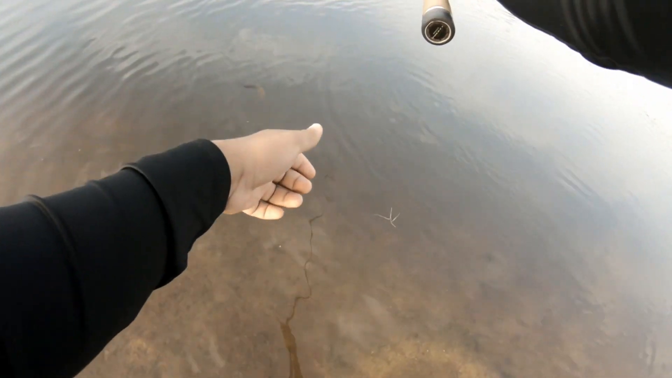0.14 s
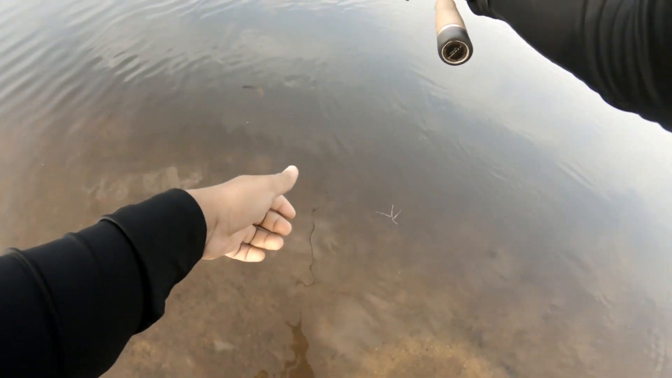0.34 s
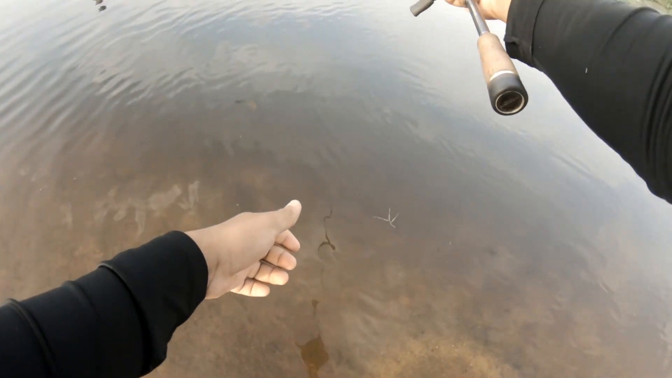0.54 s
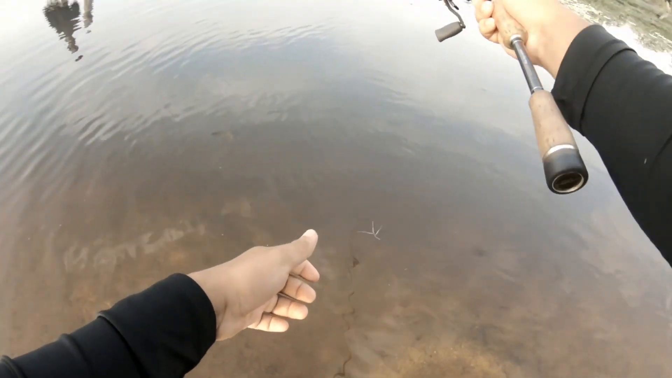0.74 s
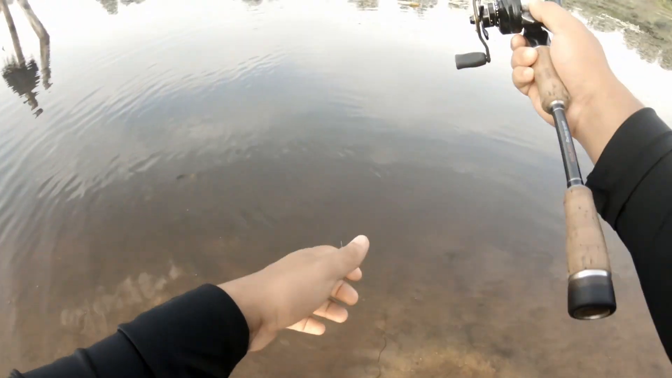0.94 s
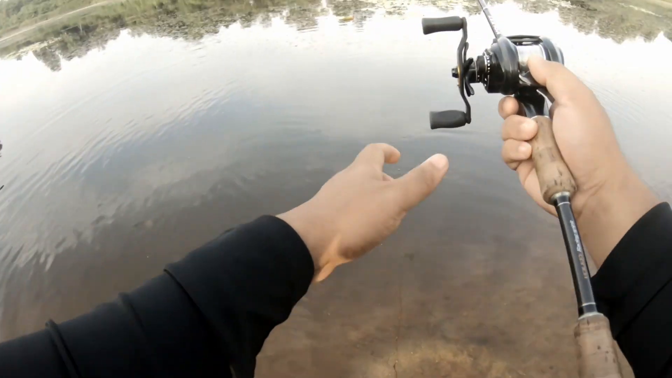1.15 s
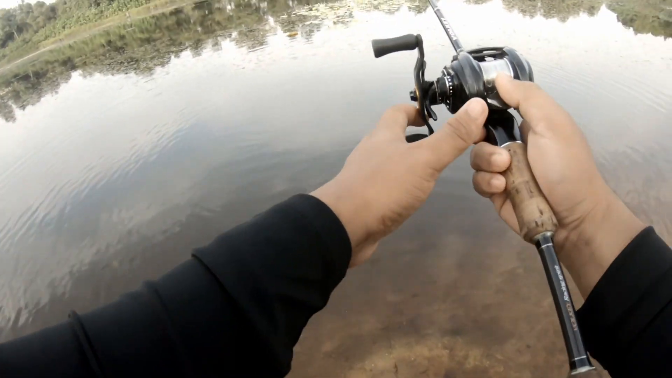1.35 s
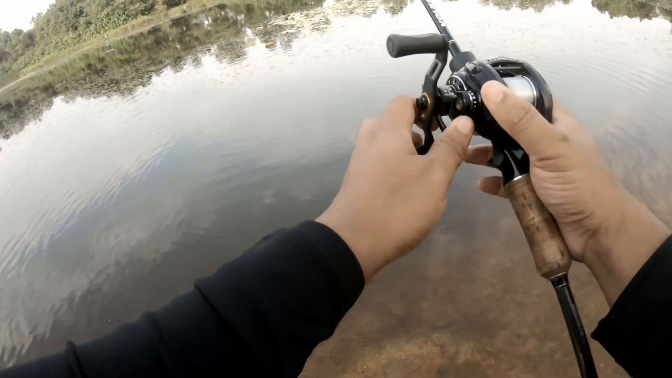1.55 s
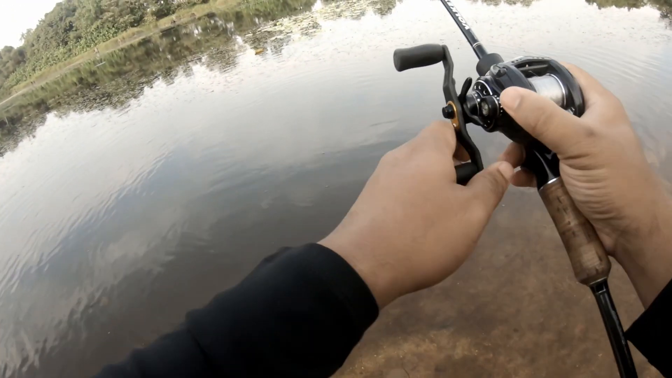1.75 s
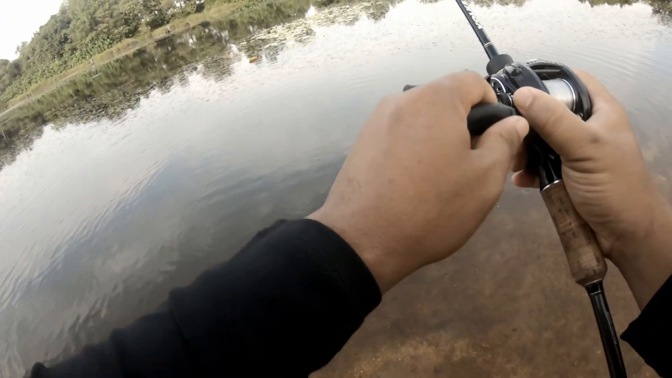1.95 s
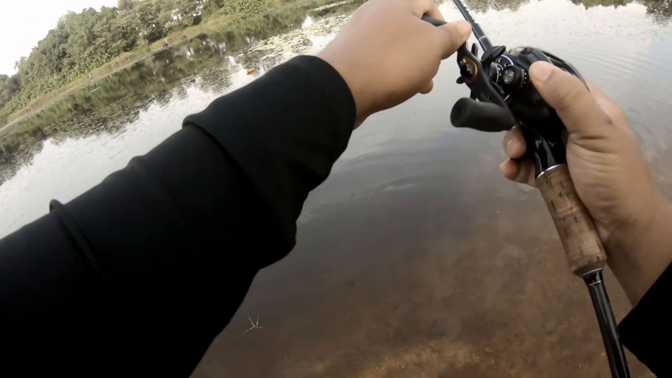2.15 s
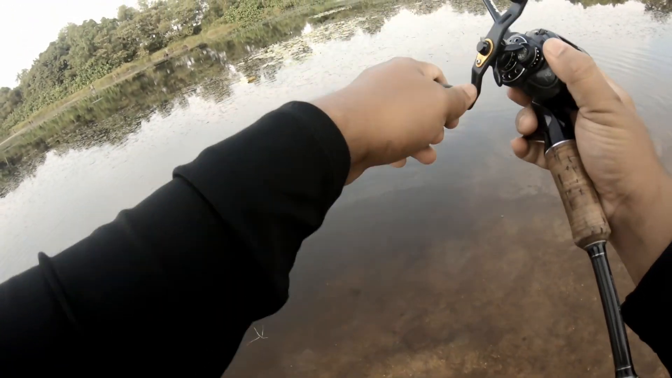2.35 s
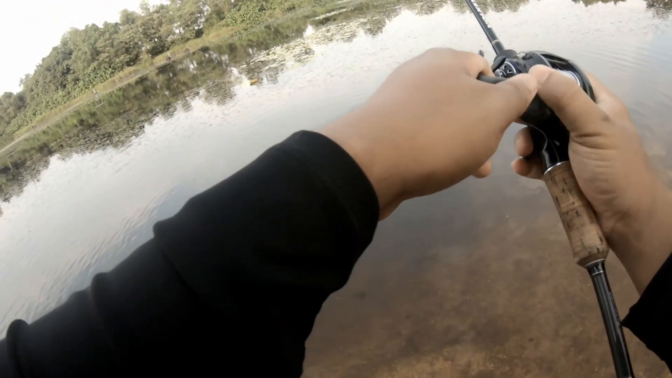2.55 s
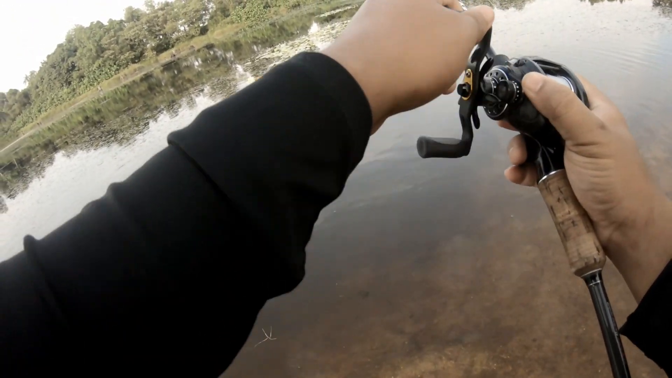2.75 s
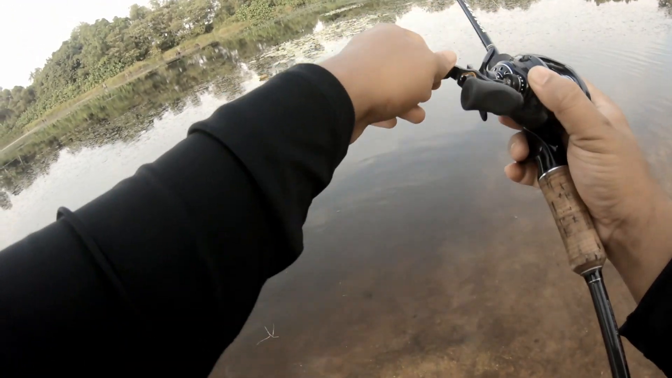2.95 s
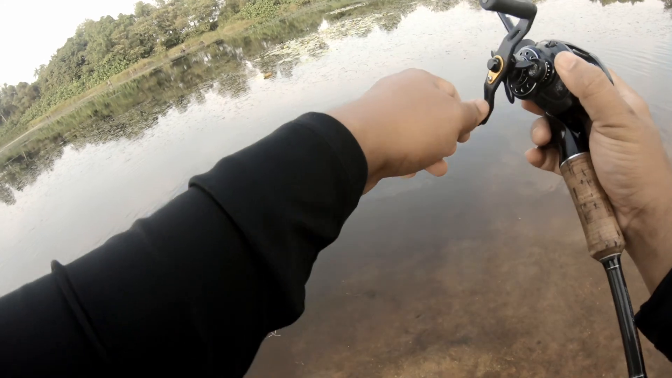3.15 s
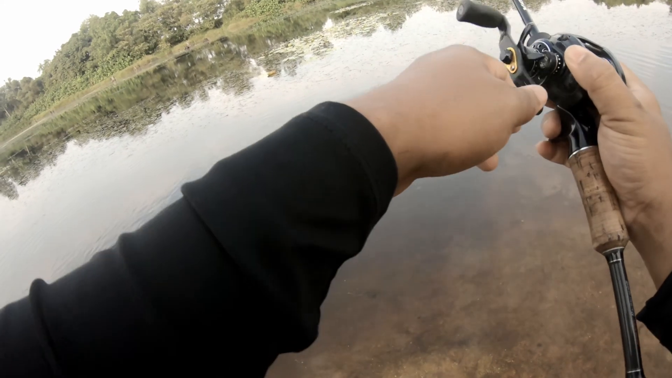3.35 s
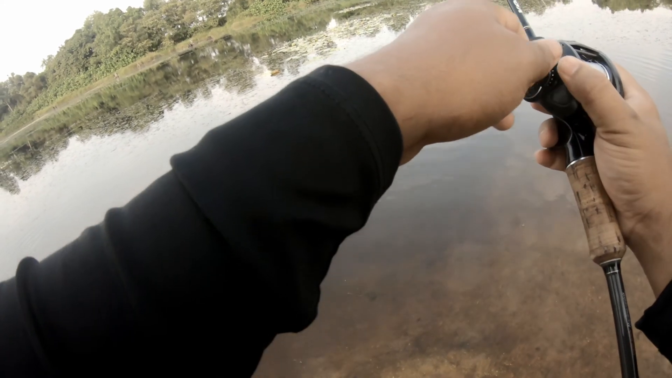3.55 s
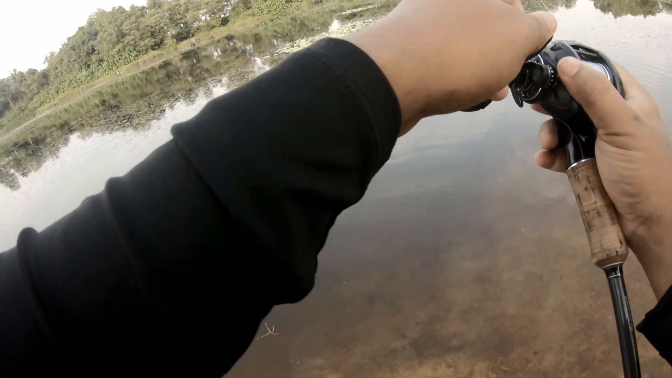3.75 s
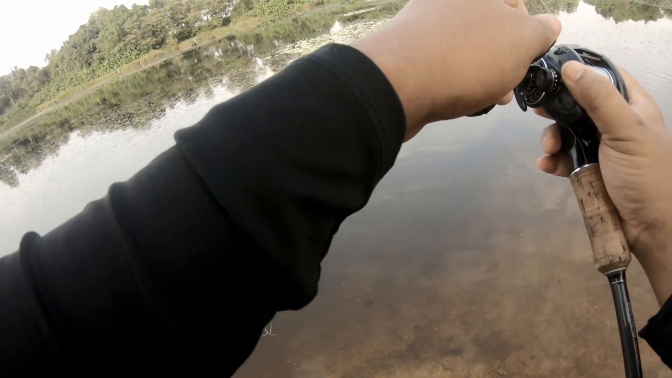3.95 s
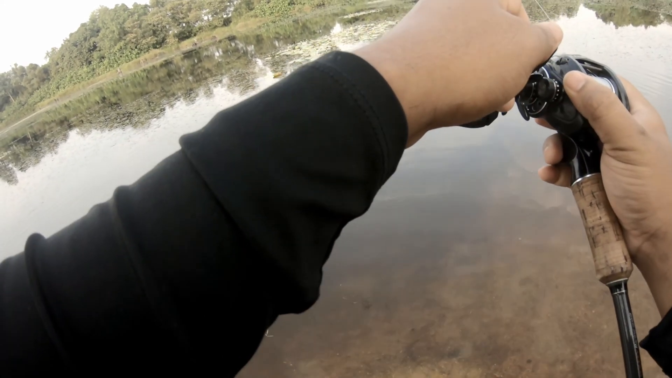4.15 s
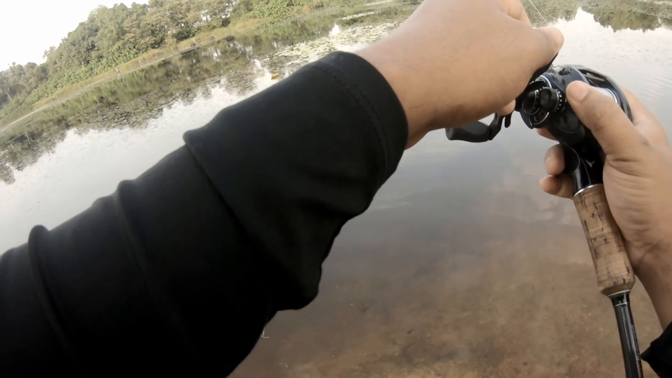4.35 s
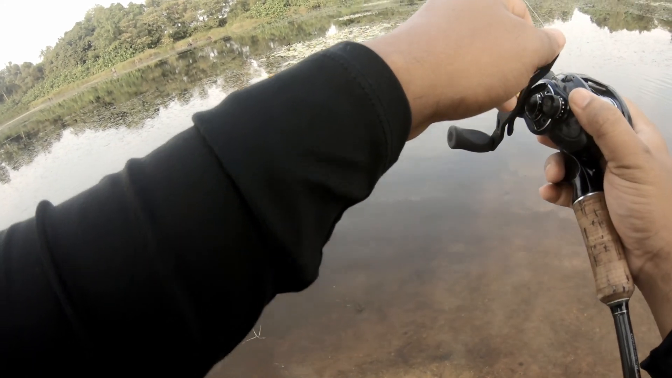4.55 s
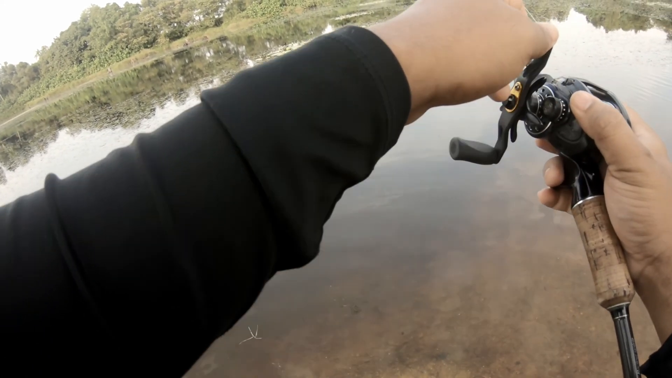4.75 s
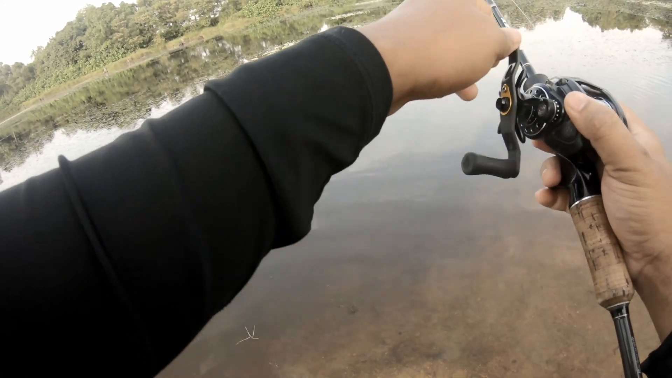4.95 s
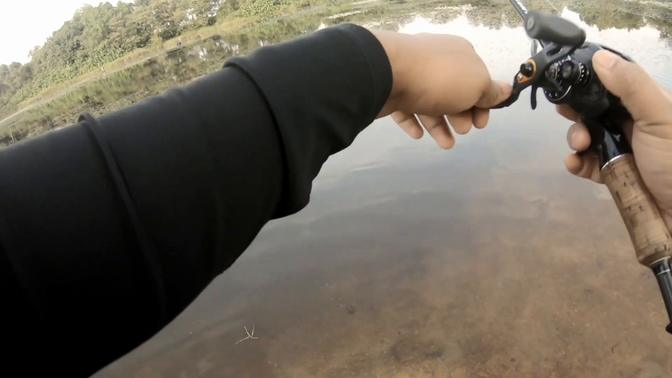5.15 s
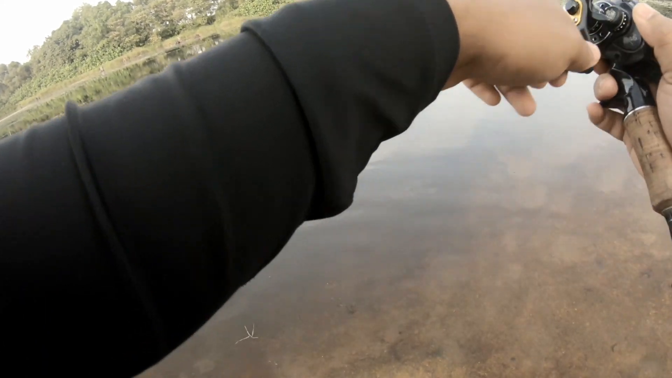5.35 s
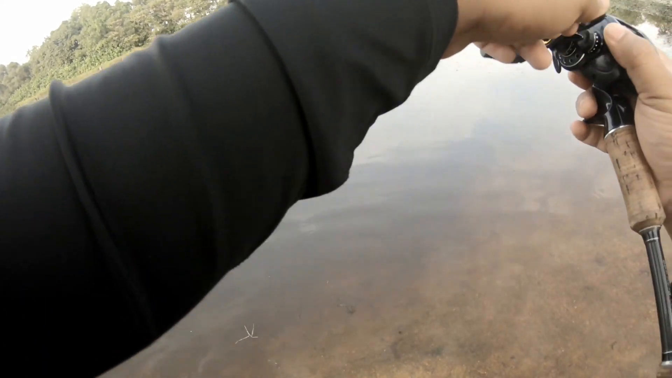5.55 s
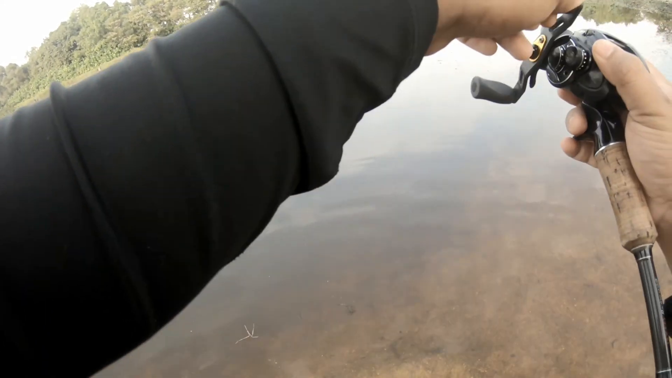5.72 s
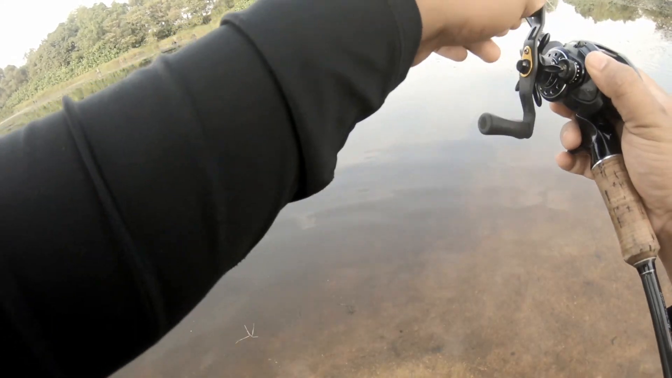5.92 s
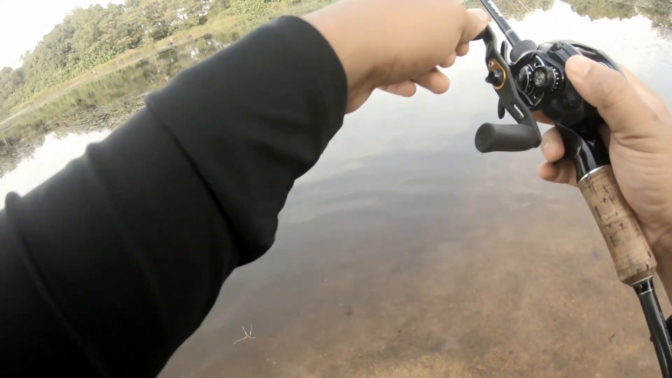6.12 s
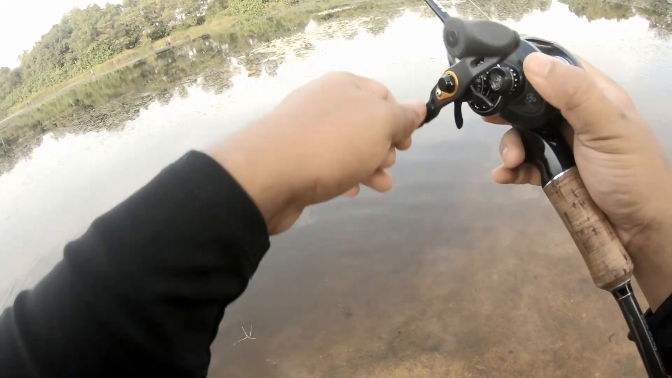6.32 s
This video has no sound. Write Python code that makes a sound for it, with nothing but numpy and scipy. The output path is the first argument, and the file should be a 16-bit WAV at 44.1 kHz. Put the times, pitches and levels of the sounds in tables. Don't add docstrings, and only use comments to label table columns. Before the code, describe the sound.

Close on the chest, a sleeve brushes and fishing line hisses. A hand bumps the grip, light ticks follow, then two loud, bright metal snaps as the reel clutch engages. Dull thuds, small rattles and a brief sagging spool whir follow. Afterwards only soft gear grinding and rare ticks remain, with far birds, shrill insects and low wind over an open pond.

```python
import sys
import numpy as np
from scipy import signal
from scipy.fft import irfft, next_fast_len
from scipy.io import wavfile
from scipy.ndimage import uniform_filter1d

SR = 44100
rng = np.random.default_rng(int(sys.argv[2]) if len(sys.argv) > 2 else 0)


def generate_wav(signal):
    frames = np.transpose(np.atleast_2d(signal))
    scaled = np.clip(frames, -1, 1) * 32767
    pcm = np.round(scaled).astype(np.int16)
    wavfile.write(sys.argv[1], SR, pcm)


def voltage_ratio(decibels):
    exponent = np.asarray(decibels, float) / 20
    return 10 ** exponent


N = 285768

PORTS = voltage_ratio([[4.0], [1.8]])


def evened(x):
    return x / np.sqrt(np.mean(x ** 2) + 1e-20)


def add(mix, s, sound):
    part = mix[..., max(round(s * SR), 0):][..., :sound.shape[-1]]
    part += sound[..., :part.shape[-1]]


def resonate(x, hz, width):
    pole = np.exp((2j * np.pi * hz - np.pi * width) / SR)
    return 2 * signal.lfilter([1 - abs(pole)], [1, -pole], x).real


def swells(rows, rest_db, column=2):
    t = np.arange(N) / SR
    return voltage_ratio(rest_db) + sum(voltage_ratio(row[column]) * np.exp(-((t - row[0]) / row[1]) ** 2) for row in rows)


def hiss(colour, size, patchy_db, flicker_db, channels=1):
    frames = N * 4 // size + 5
    hz = np.fft.rfftfreq(size, 1 / SR)
    f, db = np.transpose(colour)
    shape = np.interp(np.log(hz + 1), np.log(f), db, left=-90, right=-90)[:, None]
    patches = rng.standard_normal((frames, len(hz))).T
    patches = uniform_filter1d(patches, size // 64, 0)
    patches = evened(uniform_filter1d(patches, 8192 // size, 1))
    flicker = evened(uniform_filter1d(rng.standard_normal(frames), size=3))
    a, b = rng.standard_normal((frames, len(hz), channels, 2)).T
    spectra = (a + 1j * b) * voltage_ratio(shape + patchy_db * patches + flicker_db * flicker)
    return evened(signal.istft(spectra, nperseg=size, noverlap=size * 3 // 4)[1][:, :N])


def band(hz, width, channels=1, order=2):
    size = next_fast_len(N)
    f = np.fft.rfftfreq(size, 1 / SR)
    a, b = rng.standard_normal((2, channels, len(f)))
    spectrum = (a + 1j * b) * np.exp(-((f - hz) / width) ** order)
    return evened(irfft(spectrum, size)[:, :N])


def chorus_gain(full_db):
    start_db, full_s = -16, 4.5
    return voltage_ratio(full_db + start_db * np.maximum(1 - np.arange(N) / SR / full_s, 0))


def blows(rows):
    out = np.zeros(N)
    for s, db, hz, cycles in rows:
        t = np.arange(round(2 * cycles / hz * SR)) / SR
        add(out, s, voltage_ratio(db) * np.sin(2 * np.pi * hz * t) * np.hanning(len(t)))
    return out


def trees(x, t60, gap_s):
    taps = np.zeros(SR // 2)
    at = np.arange(round(gap_s * SR), SR // 2 - 20, 20)
    signs = rng.choice([-1., 1.], len(at))
    taps[at + rng.integers(0, 20, len(at))] = signs * voltage_ratio(-60 * at / SR / t60)
    return signal.oaconvolve(x, taps / np.linalg.norm(taps))[:N]


def bird(rows, rough, edge, wet_db, lift_db):
    out = np.zeros(N)
    flutter = uniform_filter1d(rng.standard_normal(N), size=200)
    flutter = evened(uniform_filter1d(flutter, size=200))
    for s, length, start_hz, mid_hz, end_hz, db in rows:
        u = np.linspace(0, 1, round(length * SR))
        hz = 2 * (start_hz * (u - .5) * (u - 1) + 2 * mid_hz * u * (1 - u) + end_hz * u * (u - .5))
        shape = signal.windows.tukey(len(u), edge)
        shape = shape * voltage_ratio(lift_db * np.log2(hz / mid_hz))
        add(out, s, voltage_ratio(db) * np.sqrt(2) * shape * np.sin(2 * np.pi * np.cumsum(hz) / SR))
    out = out * voltage_ratio(rough * flutter)
    return out + voltage_ratio(wet_db) * trees(out, t60=0.43, gap_s=0.0025)


def glides(rows, low):
    return [(s, length, a, low * min(a, b) + (1 - low) * max(a, b), b, db) for s, length, a, b, db in rows]


def shaped(rows, shape):
    return [(s, shape[0], *(hz * np.array(shape[1:])), db) for s, hz, db in rows]


def sleeve_and_line():
    # middle in seconds, half length in seconds, cloth level in dB, line level in dB.
    moves = [(.14, 0.3, -77, -62), (.48, 0.32, -65.5, -76.5), (.72, 0.23, -64.5, -64.5),
             (1.04, 0.14, -62.5, -65), (1.3, 0.11, -67.5, -64), (1.45, 0.0081, -80, -66),
             (1.51, 0.027, -73, -62), (1.58, 0.18, -73, -66.5), (1.663, 0.013, -58, -49),
             (1.76, 0.15, -65.5, -65), (2.14, 0.15, -67.5, -62.5), (2.55, 0.12, -71, -75),
             (3.1, 0.44, -84, -70), (3.47, 0.051, -90, -71), (4.65, 0.12, -79, -78),
             (5.2, 0.28, -78.5, -76.5), (5.43, 0.048, -73, -85), (6.48, 0.24, -66, -66.5)]
    # frequency in Hz, density in dB per Hz.
    cloth_colour = [(700, -3.5), (1100, 2.5), (1800, 0), (2600, -2.5), (3400, -3.5), (4200, -9.5)]
    # frequency in Hz, density in dB per Hz.
    line_colour = [(2800, -14.5), (3700, 0), (4500, 2.5), (5800, 0.5), (6600, -9), (7300, -6), (8200, -26),
                   (11000, -56)]
    cloth = swells(moves, rest_db=-79) * hiss(cloth_colour, size=512, patchy_db=3.0, flicker_db=0.5)
    line = swells(moves, rest_db=-84, column=3) * hiss(line_colour, size=512, patchy_db=1.8, flicker_db=1.0)
    return cloth + line


def gears():
    # middle in seconds, half length in seconds, peak in dB.
    pushes = [
        (.2, 0.52, -81),
        (.7, 0.069, -63),
        (1.05, 0.17, -72.5),
        (1.72, 0.063, -51),
        (1.83, 0.15, -62.5),
        (2.06, 0.099, -64),
        (2.35, 0.34, -78),
        (4.52, 0.072, -69),
        (4.8, 0.34, -69),
        (1.47, 0.028, -65),
    ]
    # frequency in Hz, density in dB per Hz.
    gear_colour = [(300, -6.5), (450, -0.5), (620, -6), (780, 0.5), (900, -7.5), (1000, -9.5),
                   (1400, -28.5), (2500, -47)]
    return swells(pushes, rest_db=-69.5) * hiss(gear_colour, size=512, patchy_db=1.1, flicker_db=1.8)


def line_fizz():
    # middle in seconds, half length in seconds, peak in dB.
    flick_swells = [(.1, 0.065, -73), (.27, 0.043, -71), (.68, 0.03, -73), (.745, .025, -78),
                    (1.5, 0.044, -77), (1.645, 0.027, -67), (1.72, 0.048, -72), (1.45, 0.013, -78),
                    (1.518, .008, -72), (4.495, .006, -78), (4.72, .012, -79), (5.228, .005, -74)]
    # frequency in Hz, density in dB per Hz.
    fizz_colour = [(10500, -19), (11050, -11.5), (12000, -4.5), (13000, 10), (14000, -7), (15300, -3.5),
                   (15750, -12), (15900, -56)]
    noise = hiss(fizz_colour, size=512, patchy_db=1.0, flicker_db=-2.0, channels=2)
    return PORTS * swells(flick_swells, rest_db=-100) * noise


def wind():
    # middle in seconds, half length in seconds, peak in dB.
    gusts = [
        (.22, 0.34, -41.5),
        (1.1, 0.7, -43.5),
        (1.8, 0.24, -45.5),
        (2.75, 0.45, -49),
        (3.42, 0.1, -46.5),
        (4.1, 1, -46),
        (5.3, 0.2, -43),
        (5.7, 0.42, -45.5),
        (6.5, 0.1, -36),
    ]
    # frequency in Hz, density in dB per Hz.
    wind_colour = [(18, -39), (30, -2.5), (60, 6), (90, 0), (130, -15.5), (200, -36.5)]
    return swells(gusts, rest_db=-68) * hiss(wind_colour, size=2048, patchy_db=1.5, flicker_db=2.5)


def rumble():
    # frequency in Hz, density in dB per Hz.
    hum_colour = [(80, -21), (120, -1.5), (163, 2.5), (210, -4), (300, -11.5), (380, -21), (520, -42),
                  (900, -86)]
    rumble_db, drop_db = -43.5, -4
    drop_s, back_s = 1.93, 6.16
    t = np.arange(N) / SR
    still = np.clip(np.minimum(t - drop_s, back_s - t) / .5 + .5, 0, 1)
    return voltage_ratio(rumble_db + drop_db * still) * hiss(hum_colour, size=1024, patchy_db=0.87, flicker_db=2.0)


def pond_air():
    # frequency in Hz, density in dB per Hz.
    pond_colour = [(710, -41), (1200, -0.5), (1450, -8), (2510, -9), (3030, -23), (3580, -3), (4080, -6),
                   (4740, 2), (5710, -7.5), (6330, -4), (6890, -10.5), (7420, -5.5), (10700, -12),
                   (11200, -42), (14600, -68), (22000, -120)]
    # centre in Hz, width in Hz, level in dB.
    drones = [
        (54, 18, -53),
        (165.8, 3.35, -53.5),
        (4730, 160, -79.5),
        (6320, 310, -82),
        (7450, 150, -86),
    ]
    air = voltage_ratio(-70.5) * hiss(pond_colour, size=1024, patchy_db=1.3, flicker_db=.1)
    for hz, width, db in drones:
        air += voltage_ratio(db) * band(hz, width)
    return air + PORTS * chorus_gain(-85) * band(11880, 450, channels=2)


def katydid():
    pitch_hz, per_s, at_s, blip_s = 11780, 135.68, 5.0045, .0011
    fall_hz_per_s, spread_hz, spread_db = 2e5, 30, 1.0
    drift, port_turn = .6, 2.1
    turns = (np.arange(N) / SR - at_s) * per_s + .5
    blip = np.floor(turns).astype(int)
    d = (turns % 1 - .5) / per_s
    traits = rng.standard_normal((blip.max() - blip.min() + 1, 5))
    phase, pitch, size, left, right = traits[blip - blip.min()].T
    wander = drift * np.cumsum(phase * np.diff(blip, prepend=0).clip(0, 1))
    angle = wander + 2 * np.pi * (pitch_hz + spread_hz * pitch - fall_hz_per_s * d / 2) * d
    waves = np.sin([angle + .3 * left, angle - port_turn + .3 * right])
    blips = voltage_ratio(spread_db * size) * np.exp(-(d / blip_s) ** 2) * waves
    return PORTS * chorus_gain(-76.5) * evened(blips)


def still_air():
    # frequency in Hz, density in dB per Hz.
    still_colour = [(10900, -30), (11350, -7.5), (12000, 0.5), (12600, 3), (13500, -0.5), (14500, -3.5),
                    (15700, -6), (15800, -50)]
    rise = np.minimum(np.arange(N) / SR / 2.5, 1)
    top = hiss(still_colour, size=1024, patchy_db=1.0, flicker_db=-0.2, channels=2)
    return PORTS * voltage_ratio(-78.5) * top + voltage_ratio(-92) * rise * band(11000, 330)


def whistler():
    # start in seconds, length in seconds, start in Hz, end in Hz, level in dB.
    slurs = [(.03, 0.11, 2770, 2640, -67), (.105, 0.05, 2300, 2000, -70), (.494, 0.079, 2930, 2570, -68),
             (.94, 0.13, 1565, 1964, -64.5), (1.356, 0.084, 1740, 1866, -72),
             (2.836, 0.023, 2850, 3220, -62), (3.222, 0.037, 3360, 3340, -60.5),
             (3.246, 0.036, 3390, 3180, -55), (3.414, 0.03, 2220, 1850, -65.5),
             (3.735, 0.033, 2900, 2630, -60), (3.76, .157, 2654, 1945, -58.5)]
    # start in seconds, length in seconds, start in Hz, end in Hz, level in dB.
    curls = [
        (.412, 0.11, 2630, 3770, -64.5),
        (.8, 0.16, 2385, 3650, -64.5),
        (2.903, 0.094, 3350, 2644, -57),
        (3.143, 0.065, 2680, 3400, -61.5),
        (3.545, 0.09, 1936, 3030, -61.5),
    ]
    # start in seconds, length in seconds, pitch in Hz, level in dB.
    pips = [
        (5.563, 0.017, 3520, -72),
        (3.65, 0.056, 2300, -76),
        (4.042, 0.18, 2430, -80),
        (1.085, .025, 5270, -63),
    ]
    song = glides(slurs, low=.53) + glides(curls, low=.8)
    song += [(s, length, hz, hz, hz, db) for s, length, hz, db in pips]
    return bird(song, rough=3.2, edge=0.34, wet_db=-9, lift_db=1.5)


def chipper():
    # start in seconds, length in seconds, start in
    # Hz, end in Hz, level in dB.
    flicks = [(.116, 0.026, 5900, 6300, -57), (.128, 0.012, 5480, 6500, -50), (.118, .012, 4100, 5200, -59),
              (.196, 0.03, 4950, 5000, -64), (.168, 0.025, 2740, 2970, -66), (.266, .022, 2760, 2980, -64),
              (.355, .02, 2750, 2950, -67), (.712, 0.01, 5700, 6270, -56.5), (.722, 0.015, 5150, 6320, -58),
              (.736, 0.012, 4150, 4900, -56), (.745, .012, 5300, 6300, -53.5), (.755, .01, 6570, 7200, -60),
              (1.028, 0.03, 4450, 5020, -59), (1.06, 0.073, 5030, 5140, -62),
              (.498, .016, 4050, 3550, -68.5), (3.173, .018, 3780, 4900, -67),
              (3.192, 0.015, 4840, 4970, -59.5), (3.312, 0.026, 5100, 5200, -69),
              (3.625, 0.017, 3730, 3760, -65)]
    # start in seconds, length in seconds, pitch in Hz, fall in octaves, level in dB.
    chips = [(1.787, 0.012, 3980, 0.19, -62), (1.906, 0.0088, 3920, 0.1, -62),
             (1.941, 0.013, 4090, 0.18, -52), (2.002, 0.023, 3900, 0.12, -54),
             (2.157, 0.0098, 3920, .03, -60), (2.267, 0.022, 2840, 0.2, -70),
             (3.286, .017, 4200, 0.065, -60.5), (3.4, .016, 4140, 0.34, -58),
             (3.439, 0.0088, 4150, 0.3, -48), (3.653, 0.017, 3460, 0.46, -65),
             (3.69, 0.018, 3620, 0.032, -65), (3.715, 0.015, 3790, 0.08, -61),
             (5.263, .022, 4910, .06, -63), (5.353, 0.0096, 4370, 0.37, -63.5),
             (5.438, 0.026, 4420, 0.11, -65), (5.47, 0.0077, 3830, 0.55, -67)]
    song = glides(flicks, low=.5)
    song += [(s, length, hz * 2 ** (fall / 2), hz, hz / 2 ** (fall / 2), db) for s, length, hz, fall, db in chips]
    return bird(song, rough=1.3, edge=0.45, wet_db=-3.0, lift_db=4)


def hand_knocks():
    # start in seconds, peak in dB, pitch in Hz, cycles.
    thuds = [
        (0.653, -28, 163, 2.1),
        (1.718, -33.5, 186, 1.8),
        (1.876, -25.5, 101, 0.66),
        (1.887, -29, 149, 1.22),
        (1.952, -39.5, 193, 2.5),
    ]
    return blows(thuds)


def rattles():
    # start in seconds, peak in dB, pitch in Hz, cycles.
    loose_parts = [(0.75, -45, 700, 2.2), (0.664, -37.5, 465, 1.1), (1.8685, -39, 750, 1.3),
                   (1.886, -41, 795, 1.6), (1.959, -43, 800, 1.9), (1.974, -46, 850, 1.6),
                   (2.006, -47.5, 860, 5.4), (2.057, -44, 623, 3.8), (2.089, -55, 920, 2.4),
                   (2.104, -59, 790, 3.5), (2.186, -56, 1510, 8), (1.462, -52, 760, 3),
                   (2.799, -55, 767, 2.3), (2.867, -49.5, 770, 2.1)]
    return blows(loose_parts)


def pings():
    # start in seconds, peak in dB, pitch in Hz, cycles.
    small_parts = [(1.6505, -33, 6400, 11), (1.6535, -52, 2100, 2.5), (1.671, -36, 5800, 11),
                   (1.6762, -23, 3900, 7.5), (1.6772, -30, 12050, 14), (1.6878, -38, 12000, 8.6),
                   (1.6765, -30, 720, 1.45), (1.676, -31, 1700, 4), (1.6768, -33, 2190, 3.2),
                   (1.682, -34, 5800, 12), (1.6893, -31, 5000, 3.7), (1.6905, -30, 794, 1.4),
                   (1.6872, -22, 6330, 5.4), (1.6875, -36, 5030, 13), (1.697, -33.5, 425, 2.7),
                   (1.703, -43, 1130, 4.1), (2.5305, -58, 1600, 3), (2.9, -58, 1700, 2.5),
                   (2.5965, -51, 2020, 3.4), (2.5975, -52, 1460, 3.5), (0.6648, -58, 900, 1.5),
                   (2.0738, -39, 5900, 5.8), (1.688, -24.5, 764, 2.1)]
    return blows(small_parts)


def ticks():
    # time in seconds, peak in dB, low knock in dB, top fizz in dB,
    # half length in milliseconds.
    snaps = [(0.6657, -50, 5, -8, 1.2), (1.456, -47.5, -9, -1, 2), (1.5249, -46, -18, -12, 1.6),
             (1.6342, -42.5, -10, -22, 2.7), (1.6512, -25, -7.5, -13, 1.4), (1.6771, -17, -6, -4.5, 1.8),
             (1.6875, -15, -5, -7.5, 1.36), (2.0328, -49, 11.5, -25, 1.1), (2.0743, -41, 2, -17, 2.3),
             (2.1271, -47, -10, -10, 1), (2.2334, -50, -21, -7, 2.7), (2.5314, -56, 3, -28, 1.2),
             (2.5494, -53, 8, -26, 4.5), (2.6, -63, 13, -28, 3.4), (4.6958, -49.5, 3.5, -19, 2.5),
             (5.9858, -53, -1, -17, 1.3), (6.17, -61, -15, -20, 1.5), (6.479, -50, -3, -12, 1)]
    # centre in Hz, width in Hz, level in dB.
    frame = [
        (1910, 1100, -4.5),
        (2900, 1200, -6.5),
        (4250, 1200, 0),
        (5400, 1100, -4),
        (6400, 1100, -7),
        (8800, 2500, -25),
    ]
    leaning_tick, lean_db, lean_from_hz = 6, 2.2, 5000
    same = 0.55
    out = np.zeros((2, N))
    t = np.arange(2600) / SR - .01
    top = signal.butter(8, [11600, 15450], "bandpass", fs=SR, output="sos")
    for row, (s, db, low_db, top_db, ms) in enumerate(snaps):
        noise = rng.standard_normal((4, 2600))
        scrape = np.exp(-(t * 1000 / ms) ** 2)
        swell_and_tail = np.exp(np.minimum(t / 0.004, -t / 0.007))
        burst = scrape + voltage_ratio(-16.5) * swell_and_tail
        lean = (row == leaning_tick) * lean_db * np.array([[-1], [1]])
        body = 0
        for k, (hz, width, g) in enumerate(frame):
            ring = resonate(resonate(noise[0] * burst, hz, width), hz, width)
            body = body + (-1) ** k * voltage_ratio(g + lean * (hz > lean_from_hz)) * ring
        low = noise[1] * burst
        knock = resonate(resonate(low, 740, 180) + resonate(low, 420, 300), 560, 500)
        right = same * np.roll(noise[2], 1) + np.sqrt(1 - same ** 2) * noise[3]
        fizz = signal.sosfilt(top, np.array([noise[2], right]) * burst ** 2)
        body = body / abs(body).max()
        knock = knock / abs(knock).max()
        fizz = fizz / abs(fizz).max(-1, keepdims=True)
        add(out, s - .009, voltage_ratio(db) * (body + voltage_ratio(low_db) * knock + PORTS * voltage_ratio(top_db) * fizz))
    return out


def songbird():
    # length in seconds, start in Hz, middle in Hz, end in Hz.
    fall = (.041, 3780, 2950, 1880)
    rise = (.098, 2030, 2900, 3580)
    hold = (.088, 3570, 3550, 3530)
    head = (0.017, 3700, 3400, 3460)
    # start in seconds, level in dB.
    strokes = [
        (1.178, -64),
        (1.576, -61.5),
        (1.985, -63.5),
        (2.405, -61.5),
        (2.819, -61),
        (3.26, -63),
        (3.733, -61),
    ]
    # start in seconds, rise level in dB, hold level in dB.
    held = [
        (.935, -80, -69),
        (1.33, -65.5, -68),
        (1.735, -64, -65),
        (2.135, -63.5, -64.5),
        (2.553, -64.5, -63.5),
        (2.968, -67, -65),
        (3.415, -66, -65),
        (3.888, -66, -65),
    ]
    song = [(s, *fall, db) for s, db in strokes]
    song += [(s - 0.0035, *head, db - 2.5) for s, db in strokes]
    song += [(s + 0.004 - rise[0], *rise, db) for s, db, _ in held]
    song += [(s, *hold, db) for s, _, db in held]
    return bird(song, rough=2.5, edge=.3, wet_db=-4.0, lift_db=16)


def spool():
    # time in seconds, level in dB.
    whir = [
        (1.66, -89),
        (1.71, -57),
        (1.9, -60.5),
        (2.1, -58),
        (2.16, -64.5),
        (2.5, -66),
        (2.62, -90),
    ]
    start_hz, sag_hz_per_s, width_hz = 860, 190, 260
    t = np.arange(N) / SR
    times, db = np.transpose(whir)
    hz = start_hz - sag_hz_per_s * np.clip(t - times[0], 0, 1)
    carrier = np.sqrt(2) * np.cos(2 * np.pi * np.cumsum(hz) / SR)
    return voltage_ratio(np.interp(t, times, db)) * band(0, width_hz, order=8) * carrier


def settle():
    settling = (1.7, .22, 13600, 11700, 500, -72)
    s, length, start_hz, end_hz, width, db = settling
    u = np.clip((np.arange(N) / SR - s) / length, 0, 1)
    angle = 2 * np.pi * np.cumsum(start_hz + (end_hz - start_hz) * u) / SR
    return PORTS * voltage_ratio(db) * np.sin(np.pi * u ** .5) * band(0, width, channels=2) * np.cos(angle)


def chucker():
    # start in seconds, pitch in Hz, level in dB.
    chucks = [(2.416, 863, -62), (2.577, 1055, -62), (2.761, 1044, -62), (2.867, 1065, -61),
              (3.024, 1030, -67), (4.02, 2140, -61.5), (4.058, 2040, -59.5), (4.145, 1930, -62),
              (4.2, 2054, -58), (4.283, 1960, -62), (4.357, 2100, -58.5), (4.44, 2055, -60.5),
              (4.517, 2104, -61), (5.054, 1000, -59.5), (5.105, 1153, -66.5), (5.355, 1010, -66),
              (5.41, 1100, -68), (5.439, 1037, -69), (5.083, 2320, -67.5), (5.157, 977, -59),
              (5.168, 3120, -73), (5.25, 1030, -62), (5.915, 2030, -58), (5.95, 1920, -66)]
    # length in seconds, start, middle and end as shares of the pitch.
    high_chuck = (0.016, .85, 1, 1.06)
    deep_chuck = (.021, .93, 1, 1.04)
    # start in seconds, length in seconds, start in Hz, end in Hz, level in dB.
    hoots = [
        (2.6, 0.029, 1290, 1180, -65),
        (2.622, 0.049, 1160, 1280, -65),
        (2.672, 0.051, 904, 1275, -63.5),
        (2.71, 0.16, 1257, 1174, -72),
        (2.868, 0.049, 766, 760, -67.5),
        (5.566, 0.12, 1266, 1170, -72.5),
        (5.688, 0.05, 713, 803, -66),
    ]
    high = [c for c in chucks if c[1] > 1500]
    deep = [c for c in chucks if c[1] <= 1500]
    graces = [(s - .016, .011, hz, hz, hz, db - 10) for s, hz, db in high]
    song = shaped(high, high_chuck) + shaped(deep, deep_chuck) + graces + glides(hoots, low=.5)
    return bird(song, rough=2.2, edge=0.6, wet_db=-10, lift_db=2.0)


def warbler():
    # start in seconds, length in seconds, start in Hz, end in Hz, level in dB.
    twitter = [(5.112, 0.013, 5150, 5520, -62), (5.124, .014, 5500, 5200, -59),
               (5.305, 0.011, 4950, 4900, -69), (5.325, .01, 5100, 4950, -66),
               (5.381, .012, 4450, 4200, -67), (5.396, 0.0069, 4870, 4200, -62),
               (5.408, .01, 5000, 4850, -66), (5.493, .012, 4300, 4550, -65),
               (5.503, .011, 4350, 3800, -64), (5.522, .014, 2800, 3250, -68),
               (5.533, .014, 3250, 2950, -67), (5.58, .015, 3800, 2550, -65),
               (5.605, .008, 5000, 4500, -68), (5.624, .02, 2750, 3200, -69),
               (5.639, .027, 3250, 2430, -65.5), (5.692, .01, 3450, 3100, -70),
               (5.705, .01, 3700, 3700, -68), (5.709, .012, 3300, 2750, -64),
               (5.759, .021, 3520, 3300, -66), (5.783, .008, 3500, 2900, -69),
               (5.808, .014, 2600, 3150, -66), (5.82, .024, 3150, 2380, -67),
               (4.369, 0.0085, 2250, 2880, -73), (4.418, 0.015, 2670, 3200, -77),
               (4.427, 0.0078, 2500, 1400, -69), (2.69, .032, 3500, 3730, -71),
               (4.464, 0.013, 4100, 2300, -70)]
    # start in seconds, length in seconds, start, middle and end in Hz, level in dB.
    alarm = (4.451, .015, 4700, 4550, 4150, -52)
    return voltage_ratio(-3) * bird(glides(twitter, low=.5) + [alarm], rough=2.5, edge=.6, wet_db=-8, lift_db=13)


def scene():
    reel = gears() + line_fizz() + ticks() + pings() + rattles() + spool() + settle()
    hands = sleeve_and_line() + hand_knocks()
    pond = wind() + rumble() + pond_air() + katydid() + still_air()
    far_birds = whistler() + chipper() + songbird() + chucker() + warbler()
    return reel + hands + pond + far_birds


def low_pass(x):
    return signal.sosfilt(signal.butter(12, 16650, fs=SR, output="sos"), x)


def record(dry):
    t = np.arange(N) / SR
    treble = signal.sosfiltfilt(signal.butter(8, 7300, "highpass", fs=SR, output="sos"), dry)
    dropout = np.interp(t, [1.659, 1.662, 1.671, 1.674], [0, 1, 1, 0])
    rolloff = signal.butter(10, 16600, fs=SR, output="sos")
    heard = signal.sosfiltfilt(rolloff, dry - dropout * treble)
    return low_pass(heard)


dry = scene()
out = record(dry)
generate_wav(out)
```